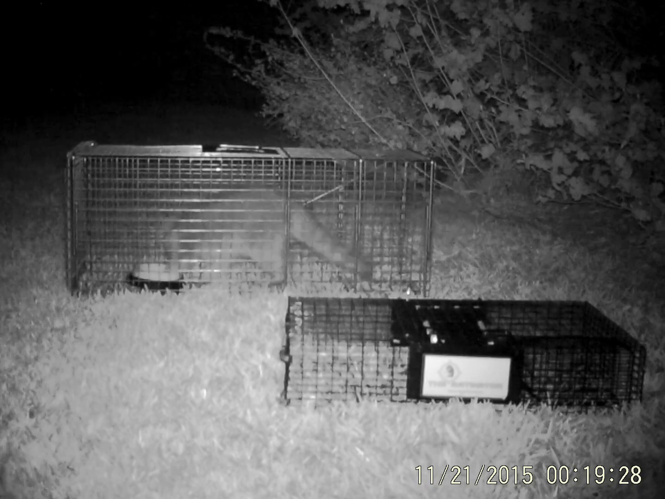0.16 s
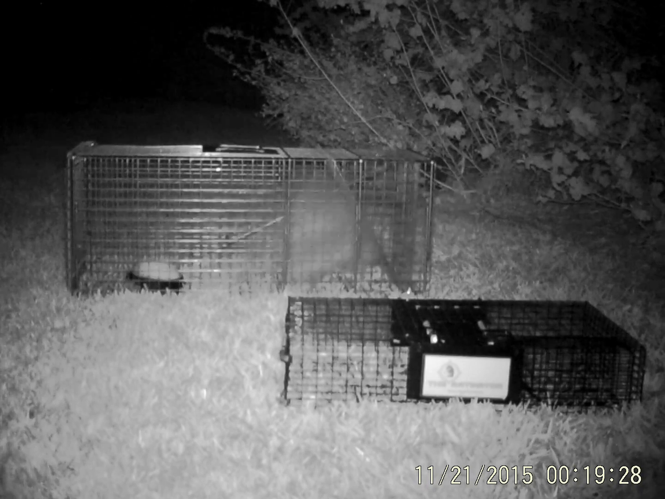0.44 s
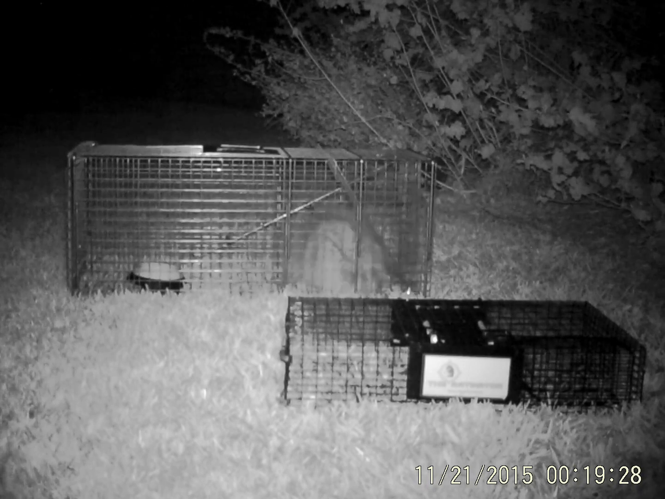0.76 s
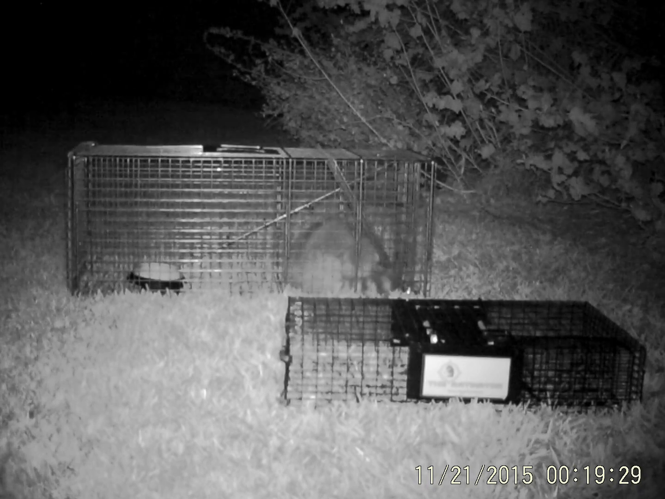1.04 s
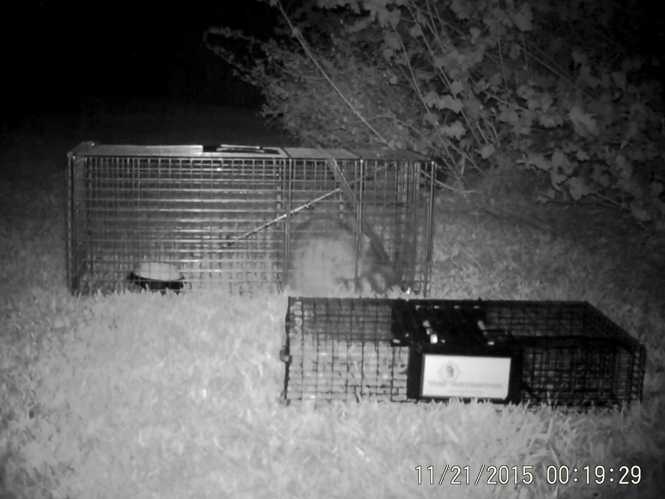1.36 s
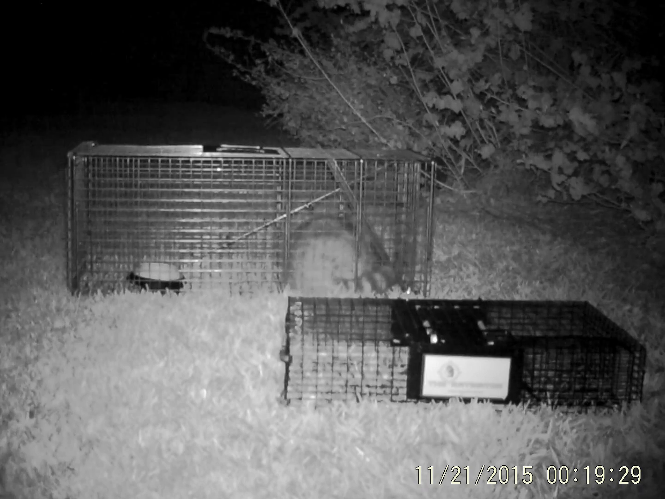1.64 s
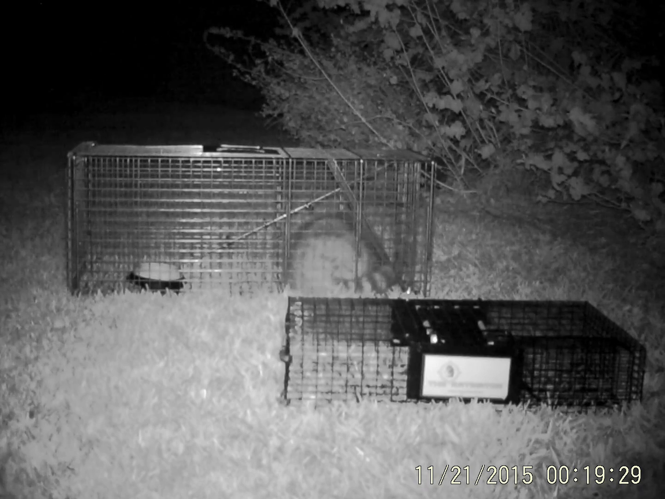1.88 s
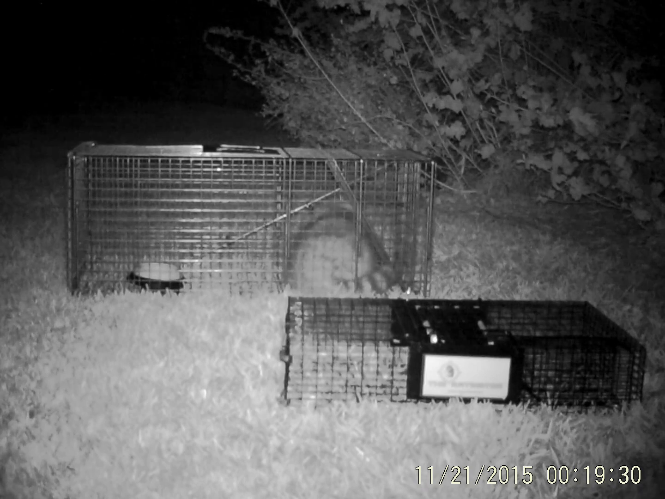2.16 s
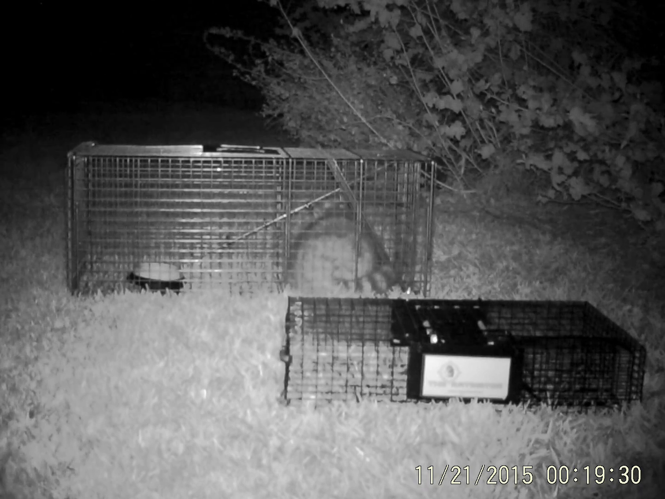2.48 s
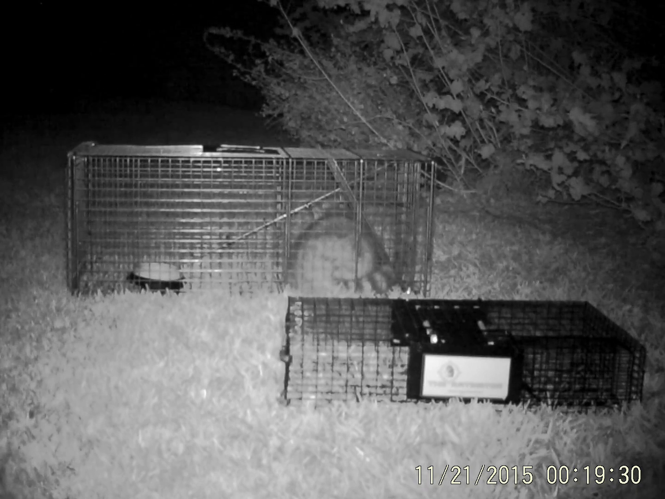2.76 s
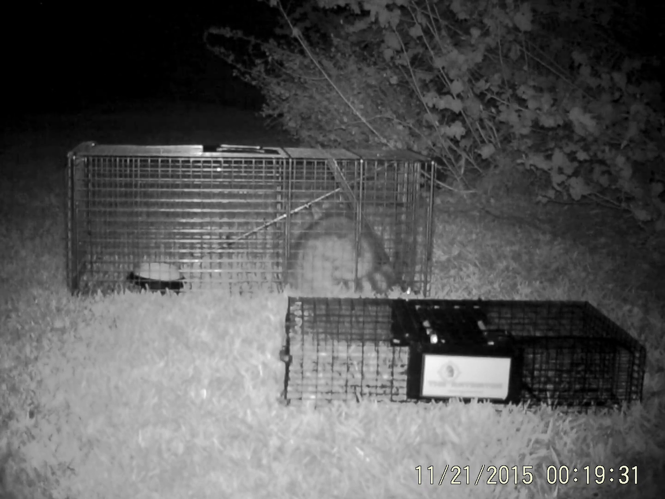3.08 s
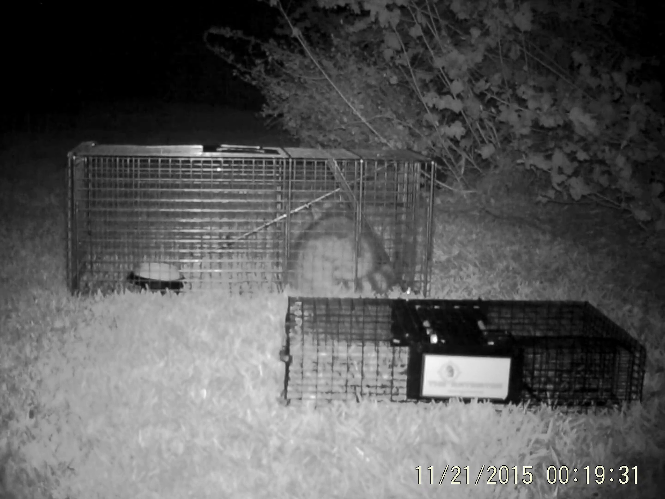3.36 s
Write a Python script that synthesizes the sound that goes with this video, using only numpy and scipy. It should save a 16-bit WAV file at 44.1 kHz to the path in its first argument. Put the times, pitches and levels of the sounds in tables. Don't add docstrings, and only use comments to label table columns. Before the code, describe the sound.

Metal cage trap rattles and clanks violently as an animal lunges inside, then only hiss

```python
import sys
import numpy as np
from scipy import signal
from scipy.fft import rfft, irfft
from scipy.io import wavfile

SR = 44100
rng = np.random.default_rng(int(sys.argv[2]) if len(sys.argv) > 2 else 0)


def master_out(mix):
    frames = np.transpose(np.atleast_2d(mix))
    ceiling = np.clip(frames, -1, 1)
    pcm = np.round(ceiling * 32767).astype(np.int16)
    wavfile.write(sys.argv[1], SR, pcm)


def ratio(d):
    e = np.asarray(d, float) / 20
    return 10 ** e


N = 155232


def rms_one(x):
    return x / np.sqrt(np.mean(x ** 2) + 1e-20)


def at_hz(points, hz):
    table_hz, table_db = np.array(points).T
    return np.interp(np.log(hz), np.log(table_hz), table_db)


def colour(x, points):
    hz = np.maximum(np.fft.rfftfreq(len(x), 1 / SR), 1)
    return irfft(rfft(x) * ratio(at_hz(points, hz)), len(x))


def drift(rate_hz):
    r = np.exp(-2 * np.pi * rate_hz / SR)
    settle = 8000
    noise = rng.standard_normal(N + settle)
    return rms_one(signal.lfilter([1], [1, -2 * r, r * r], noise)[settle:])


def ring(x, hz, t60_s):
    r = ratio(-60 / (t60_s * SR))
    w = 2 * np.pi * hz / SR
    return signal.lfilter([0, np.sin(w)], [1, -2 * r * np.cos(w), r * r], x + 1e-18)


def swell(rows):
    rise_s = 0.006
    t = np.arange(N) / SR
    power = 1e-12
    for start_s, db, hold_s, t60_s in rows:
        rise = np.clip((t - start_s) / rise_s, 0, 1)
        dying_s = np.clip(t - start_s - rise_s - hold_s, 0, 2)
        power = power + (rise * ratio(db - 60 * dying_s / t60_s)) ** 2
    return np.sqrt(power)


def contacts():
    contacts_per_s, spread_db = 9000, 2.5
    clump_db, clumps_per_s = 1.3, 70
    uneven_db = spread_db * np.minimum(rng.exponential(1, N), 4)
    sizes = ratio(uneven_db + clump_db * drift(clumps_per_s))
    return sizes * rng.choice([-1, 1], N) * (rng.random(N) < contacts_per_s / SR)


def rung(clicks, level, modes):
    dealt = rng.integers(0, 3 * len(modes), N)
    both = np.array([clicks, clicks * level])
    total = 0
    for k, (hz, width_hz, db) in enumerate(modes):
        t60_s = min(0.096, 1.8 / width_hz)
        total = total + ratio(db) * np.sqrt(width_hz) * ring(both * (dealt == k), hz, t60_s)
    steady, shaken = total
    return shaken / np.sqrt(np.mean(steady ** 2))


WIRE_DB = -5.5
LUNGE_STARTS = [-.004, .092, .129, .167, .2, .387, .409, .678, .74, .826, .888, .94, 1.004, 1.17]
# (level [dB], hold [s], t60 [s], sheen [dB])
LUNGES = [(-48, 0.015, 0.78, -11), (-49, 0.0086, 0.14, -10), (-48, 0.031, 0.43, -13),
          (-37.5, 0.0075, 0.29, -10), (-30.5, 0.021, 0.69, -8.5), (-40, 0.0078, 0.29, -8),
          (-37.5, 0.083, 0.61, -9), (-42.5, 0.036, 0.81, -11.5), (-45.5, 0.043, .6, -11),
          (-51, 0.017, .6, -14), (-52, .02, 0.86, -23), (-44.5, 0.017, 0.13, -25),
          (-54, 0.0056, 0.043, -22), (-56.5, 0.014, 0.11, -15)]
# (frequency [Hz], density [dB/Hz])
MESH_RUSH = [(1590, -36), (2700, -10), (3220, -1.5), (3710, -3), (4000, 6), (4470, 7), (5060, 4),
             (6400, -0.5), (8500, -23.5), (11000, -13), (18700, -120)]
# (frequency [Hz], density [dB/Hz])
WIRE_SHEEN = [(4410, -32), (7500, -3.5), (8970, -9), (10300, -4.5), (11800, -1.5), (12800, -8),
              (14400, -1.5), (15200, -8), (15700, -5.5)]
# (frequency [Hz], width [Hz], level [dB])
FRAME_MODES = [(3264, 90, -3), (3810, 52, -10), (4030, 16, -3), (4280, 34, -2), (4575, 30, 1),
               (4440, 20, 0), (4390, 13, -3), (4770, 120, -3), (3660, 24, -9), (5660, 24, -4),
               (5380, 25, -2), (5740, 22, -3), (6430, 30, -5.5), (7330, 79, -11)]


def mesh():
    shakes, sheens = [], []
    for start_s, (db, hold_s, t60_s, sheen_db) in zip(LUNGE_STARTS, LUNGES):
        shakes.append((start_s, db, hold_s, t60_s))
        sheens.append((start_s, db + sheen_db, hold_s, t60_s))
    level = swell(shakes)
    clicks = contacts()
    rush = ratio(WIRE_DB) * level * rms_one(colour(clicks, MESH_RUSH))
    sheen = swell(sheens) * rms_one(colour(clicks, WIRE_SHEEN))
    frame = ratio(-7.5) * rung(clicks, level, FRAME_MODES)
    return rush + sheen + frame


# (time [s], level [dB], hold [s], t60 [s])
PANEL_SHAKES = [
    (0.0, -49.5, 0.009, 0.61),
    (.171, -49.5, 0.026, .3),
    (.197, -40.5, 0.043, 1),
    (.388, -44.5, 0.1, 0.74),
    (.674, -48, 0.13, 0.92),
    (.8, -54, 0.035, 0.45),
    (.888, -52.5, 0.047, .3),
    (.94, -54, 0.04, 0.2),
    (1.0, -57, .02, 0.78),
    (1.14, -60, 0.025, 0.18),
]
# (frequency [Hz], density [dB/Hz])
PANEL_RUSH = [(300, -3), (500, -3.5), (900, -8), (1400, -0.5), (2200, 2), (2700, -3), (3500, -14.5)]
# (frequency [Hz], width [Hz], level [dB])
PANEL_MODES = [(823, 31, -3), (1090, 76, -2), (1390, 53, 1.5), (1740, 81, -7), (2250, 58, 1.5)]


def panels():
    level = swell(PANEL_SHAKES)
    clicks = contacts()
    rush = ratio(WIRE_DB) * level * rms_one(colour(clicks, PANEL_RUSH))
    return rush + ratio(-5.5) * rung(clicks, level, PANEL_MODES)


# (time [s], peak [dB], tilt [dB/octave], t60 [s])
KNOCKS = [(0.2146, -17.5, 8, 0.018), (0.225, -19, 11.5, 0.02), (0.258, -25, 2, 0.02),
          (0.264, -24, 6, 0.015), (0.299, -20, 3, 0.013), (0.388, -27, 9, 0.03), (0.392, -25.5, 11, 0.04),
          (0.414, -27.5, 10.5, 0.066), (0.424, -29, 4, 0.033), (0.446, -36, 8, 0.02),
          (0.477, -33, 9, 0.033), (0.493, -28, 4, 0.02), (0.502, -25, 5, 0.02), (0.673, -31, 7, 0.022),
          (0.6806, -26.5, 5.5, 0.019), (0.714, -35, 6, 0.012), (0.741, -33, 3, 0.023),
          (0.763, -37, 5, 0.012), (0.785, -23, 10.5, 0.037), (0.827, -30, 16, 0.015),
          (0.83, -27, 11.5, 0.03), (0.836, -34, 9, 0.034), (0.871, -35, 14.5, 0.034), (0.89, -32, 2, 0.028),
          (0.936, -21.5, 6.5, 0.042), (0.943, -31, 4, 0.078), (0.957, -22, 5, 0.026),
          (0.972, -26, 2, 0.017), (0.982, -26.5, -1, 0.029), (0.986, -36, -4, 0.024), (1.004, -35, 6, 0.03),
          (1.012, -33.5, 6, 0.028), (1.02, -39, 4, 0.02), (1.0708, -26, 6, 0.022), (1.076, -30.5, 2, 0.027),
          (1.08, -36, -1, 0.04), (1.1186, -24.5, 7.5, 0.021), (1.172, -34, 1, 0.025),
          (1.181, -34.5, 5, 0.024), (1.191, -37, 8, 0.015), (1.223, -37, 9, 0.023), (1.41, -32.5, 11, 0.02),
          (1.412, -41, 0, 0.025), (0.096, -37, 0, 0.03), (0.133, -40, 2, 0.036), (0.171, -33, 3, 0.023),
          (0.178, -27.5, 2, 0.012), (0.219, -33, 10, 0.013), (0.252, -21, 10, 0.02)]
# (frequency [Hz], density [dB/Hz])
CRACK = [(240, 18), (400, -39), (687, -4), (2400, -6), (2730, -21), (4430, -1), (6600, -12), (7940, -28),
         (12000, -14), (15600, -54), (22000, -120)]
# (frequency [Hz], width [Hz], level [dB])
DOOR_MODES = [(740, 450, -1), (1070, 67, -8), (1770, 130, -3.5), (2490, 89, -6), (3030, 130, -10),
              (3320, 130, -6), (3770, 170, -10.5), (4370, 120, -13), (5230, 40, -6.5), (5770, 54, -6),
              (6150, 86, -13), (6370, 140, -6.5), (7100, 300, -26)]


def knocks():
    knock_db, crack_db, door_db, mode_spread_db = -4.5, -13.5, -15, 2.5
    rise_s, low_lag_s = 0.0005, 0.0015
    length = 4096
    out = np.zeros(N + length)
    t = np.arange(length) / SR
    for start_s, db, tilt_db, t60_s in KNOCKS:
        noise = rng.standard_normal(length)
        tilted = [(hz, level + tilt_db * np.log2(hz / 3000)) for hz, level in CRACK]
        crack_shape = np.minimum(t / rise_s, 1) * ratio(-60 * t / t60_s)
        hit = ratio(crack_db) * rms_one(colour(noise, tilted)) * crack_shape
        for hz, width_hz, mode_db in DOOR_MODES:
            slowness = (3000 / hz) ** 0.5
            u = np.maximum(t - low_lag_s * (slowness - 0.5), 0)
            shape = np.minimum(u / rise_s / slowness, 1) * ratio(-60 * u / (t60_s * slowness))
            luck_db = mode_spread_db * rng.standard_normal()
            level = ratio(door_db + mode_db + tilt_db * np.log2(hz / 3000) + luck_db)
            hit += level * shape * rms_one(ring(noise, hz, 1.26 / width_hz))
        i = int(start_s * SR)
        out[i:i + length] += ratio(db + knock_db) * hit
    band = signal.butter(4, (560, 7500), "band", fs=SR, output="sos")
    return signal.sosfilt(band, out[:N])


# (time [s], rms [dB], pitch [Hz], hold [s])
PINGS = [(0.015, -53.5, 3310, 0.014), (.21, -50.5, 798, 0.042), (.209, -36.5, 4400, 0.031),
         (0.244, -39.5, 4575, 0.017), (0.495, -47, 960, 0.005), (0.495, -46, 1380, 0.006),
         (0.605, -51, 1370, 0.011), (0.672, -53, 1870, .003), (0.679, -57, 1600, 0.0028),
         (0.784, -44, 650, 0.0027), (0.887, -55, 1870, 0.013), (0.958, -55, 1700, 0.001),
         (0.964, -41, 1747, 0.012), (0.973, -50.5, 997, 0.0045), (1, -54, 1810, 0.008),
         (1.117, -48, 2380, 0.001), (1.118, -48.5, 1790, 0.002), (1.12, -49, 748, 0.0028),
         (1.41, -54, 5460, 0.0026), (1.074, -53, 3850, 0.0022), (0.937, -43, 4400, .002),
         (0.933, -46, 2400, .002), (0.497, -53, 770, 0.0018)]


def pings():
    rise_s, t60_s, relative_width = 0.0023, 0.048, 0.05
    length, settle = 4096, 1000
    out = np.zeros(N + length)
    t = np.arange(length) / SR
    for start_s, db, hz, hold_s in PINGS:
        noise = rng.standard_normal(length + settle)
        note = signal.hilbert(ring(noise, hz, 2.2 / (relative_width * hz)))[settle:]
        note = rms_one(note.real / np.sqrt(abs(note)))
        dying_s = np.maximum(t - rise_s - hold_s, 0)
        shape = np.minimum(t / rise_s, 1) * ratio(db - 60 * dying_s / t60_s)
        i = int(start_s * SR)
        out[i:i + length] += note * shape
    return out[:N]


# (time [s], peak [dB], pitch [Hz], t60 [s])
THUDS = [(0.39, -32.5, 168, 0.042), (.388, -45.5, 305, 0.11), (0.425, -34.5, 156, 0.033),
         (.44, -46.5, 203, 0.071), (0.471, -48, 109, 0.1), (0.767, -41.5, 106, 0.058),
         (0.775, -46, 110, 0.025), (0.786, -42.5, 474, 0.04), (0.787, -45, 228, 0.047),
         (0.798, -43.5, 157, 0.079), (0.822, -47, 193, 0.049), (0.835, -49, 91, 0.06),
         (0.977, -47, 520, .04), (0.936, -51, 524, .04), (0.981, -45.5, 246, 0.032)]


def thuds():
    length = 8192
    out = np.zeros(N + length)
    t = np.arange(length) / SR
    rise = np.minimum(t / 0.0065, 1)
    for start_s, db, hz, t60_s in THUDS:
        i = int(start_s * SR)
        out[i:i + length] += ratio(db - 60 * t / t60_s) * rise * 2 * np.sin(2 * np.pi * hz * t)
    return out[:N]


# (frequency [Hz], density [dB/Hz])
HISS = [(14, -60), (24, 4.5), (32, -18), (54, -1), (116, -3), (247, -12), (361, -12.5), (7500, -23.5),
        (13000, -23.5), (15600, -24.5)]


def hiss():
    hiss_db, flicker_db = -55.5, 0.15
    return ratio(hiss_db + flicker_db * drift(3.7)) * rms_one(colour(rng.standard_normal(N), HISS))


def scene():
    mono = mesh() + panels() + knocks() + pings() + thuds() + hiss()
    return np.tile(mono, (2, 1))


# (centre time [s], low edge [Hz], high edge [Hz])
WIDE_BANDS = [(.048, 12250, 13750), (.466, 7500, 9000), (.582, 10300, 13900), (.814, 9650, 11800),
              (1.325, 12400, 13750), (1.372, 5150, 6400), (1.372, 11600, 13750), (1.673, 4500, 5800),
              (1.79, 13750, 15200), (1.952, 10300, 12400), (1.952, 13100, 15200), (2.068, 11600, 13100),
              (2.184, 4500, 5800), (2.184, 8800, 11800), (2.184, 13750, 15800), (2.231, 4500, 5800),
              (2.3, 7500, 10300), (3.16, 7500, 9650), (3.16, 11600, 13100), (3.206, 5150, 6900),
              (3.276, 9650, 11100), (3.322, 7500, 9000)]


def widen_bands(x):
    out = x.copy()
    hz = np.fft.rfftfreq(2048, 1 / SR)
    window = np.sin(np.pi / 2 * np.hanning(2048))
    for centre_s, low_hz, high_hz in WIDE_BANDS:
        centre = int(centre_s * SR)
        i = slice(centre - 1024, centre + 1024)
        inside = (hz > low_hz) * (hz < high_hz)
        band = irfft(rfft(x[0, i] * window) * inside) * window
        other = irfft(rfft(rng.standard_normal(2048) * window) * inside) * window
        side = rms_one(other) * np.sqrt(0.5 * np.mean(band ** 2))
        out[:, i] += (np.sqrt(0.5) - 1) * band + side * np.array([[1], [-1]])
    return out


def top_cut(x):
    return signal.sosfilt(signal.butter(12, 16290, fs=SR, output="sos"), x)


def record(dry):
    lowpass = signal.ellip(12, 0.1, 70, 15660, fs=SR, output="sos")
    cut = signal.sosfilt(lowpass, dry)
    mix = widen_bands(cut) + 0.0046
    return top_cut(mix)


dry = scene()
out = record(dry)
master_out(out)
```